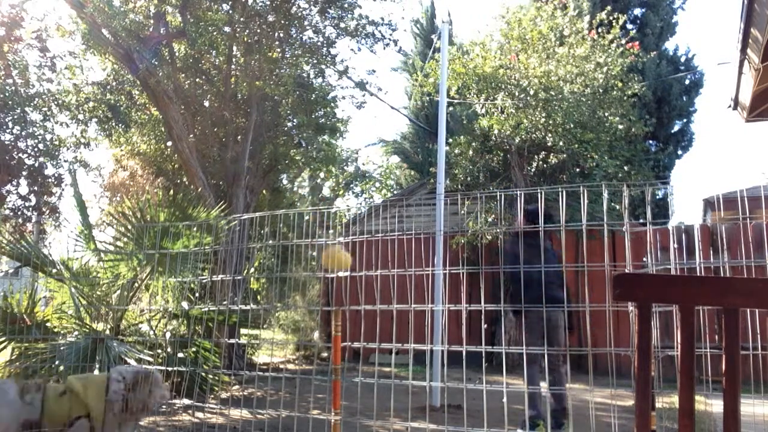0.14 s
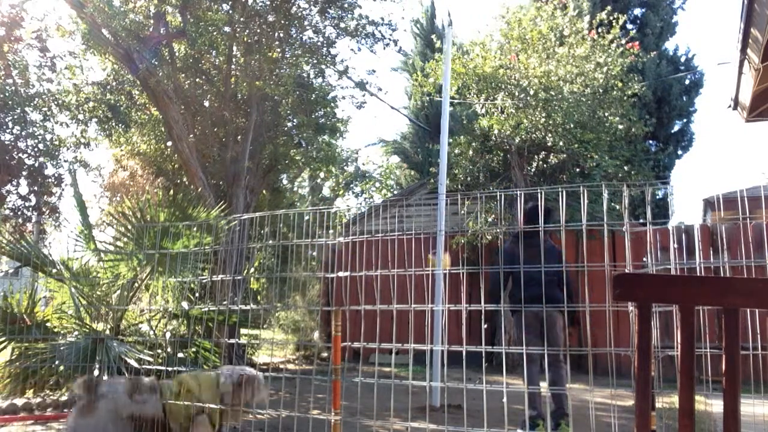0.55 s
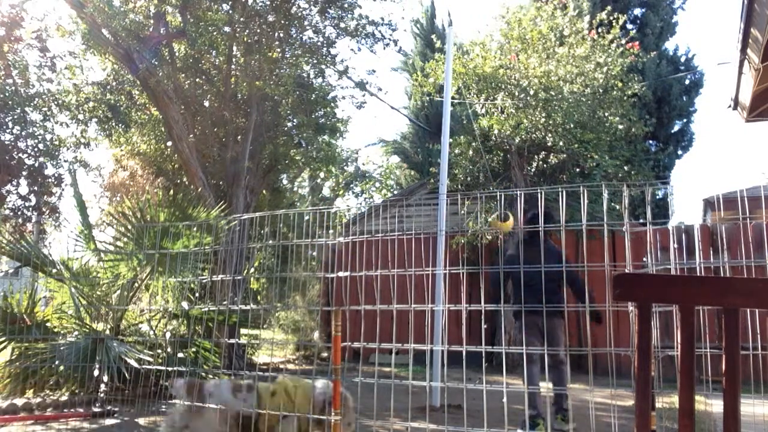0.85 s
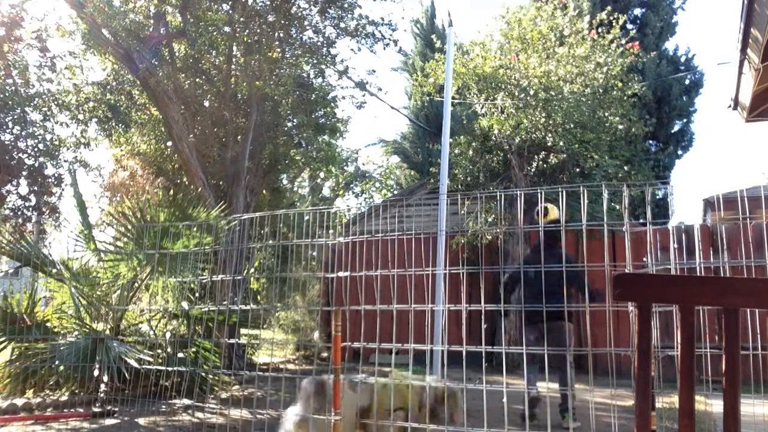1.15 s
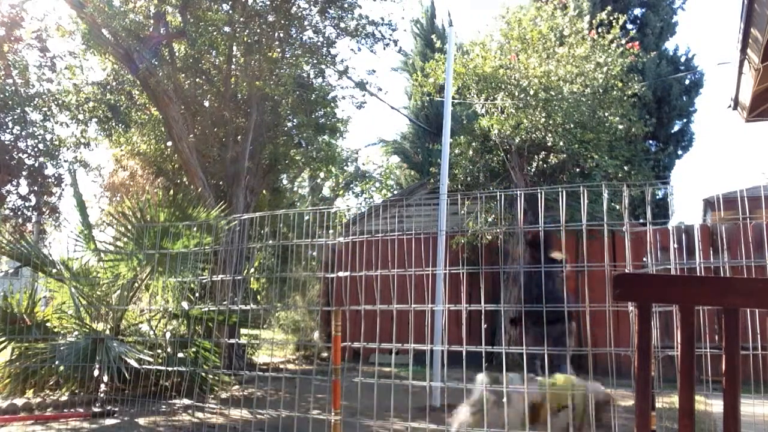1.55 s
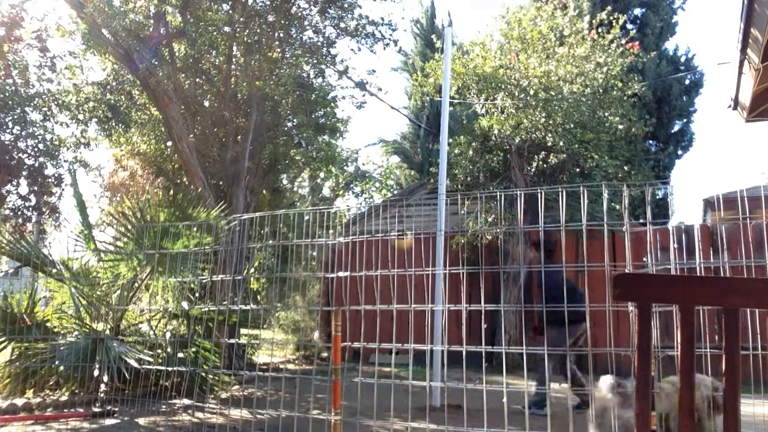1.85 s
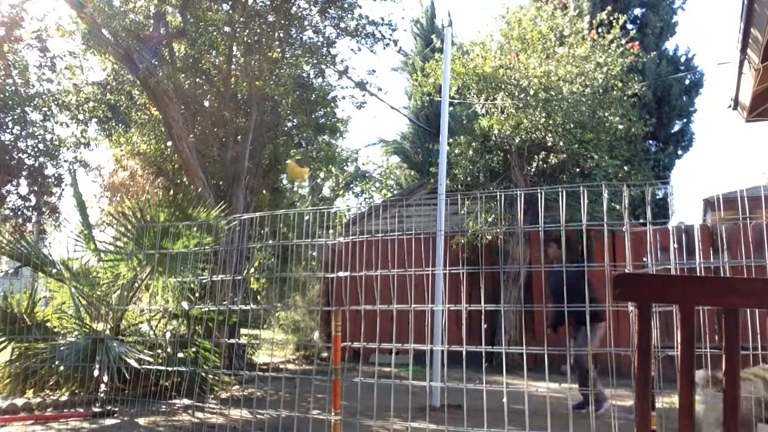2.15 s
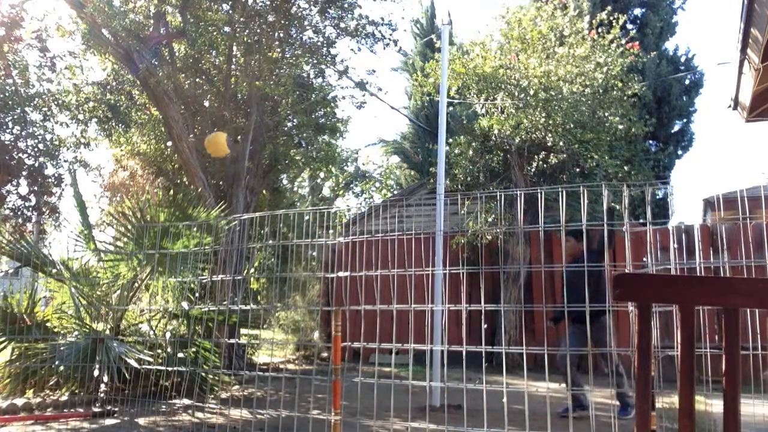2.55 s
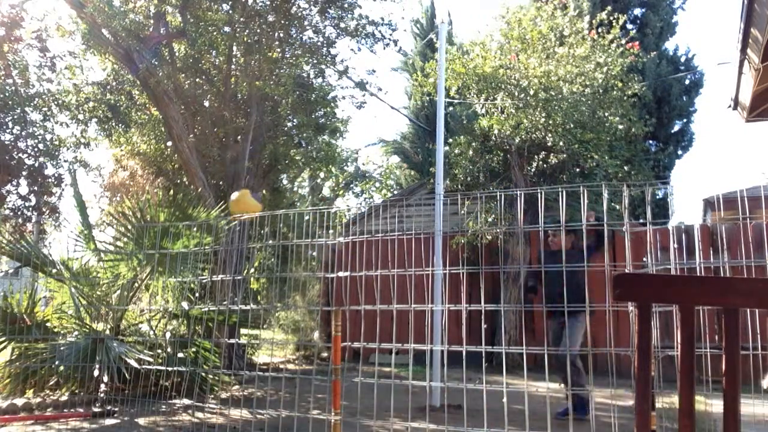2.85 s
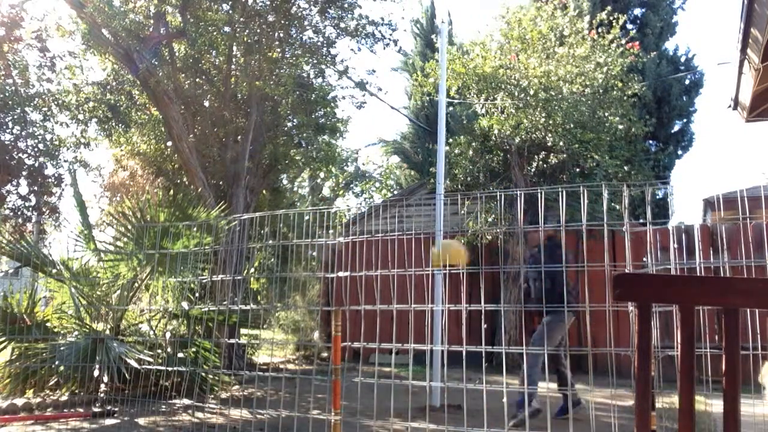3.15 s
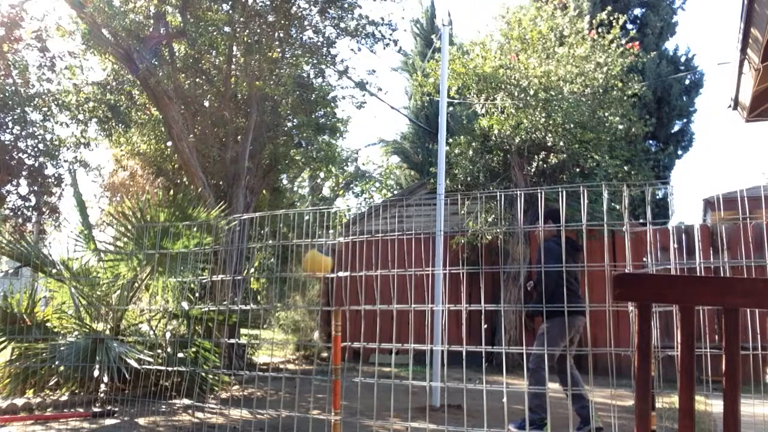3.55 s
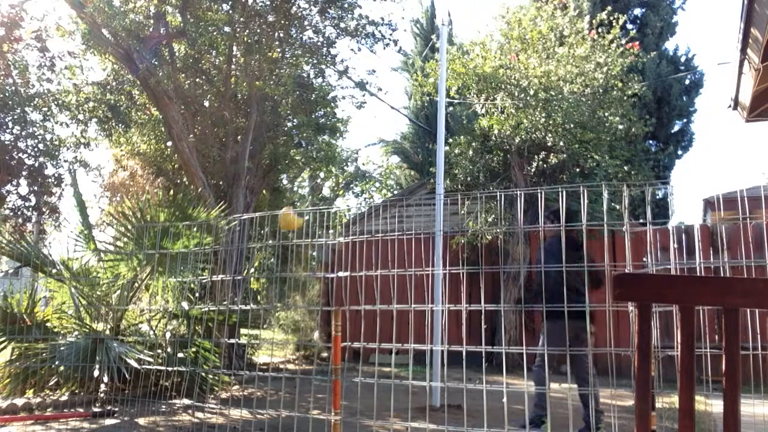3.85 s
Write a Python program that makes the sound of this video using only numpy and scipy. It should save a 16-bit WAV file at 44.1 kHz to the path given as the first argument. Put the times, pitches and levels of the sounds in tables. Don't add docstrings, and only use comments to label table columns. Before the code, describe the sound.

Outdoors in a fenced yard, light clinks and scuffs lead to a hollow ball punch, then sharper metal knocks, then a louder punch and gritty steps, over faint traffic hum and hiss from a distant mono microphone.

```python
import sys
import numpy as np
from scipy import signal
from scipy.io import wavfile

SR = 44100
rng = np.random.default_rng(int(sys.argv[2]) if len(sys.argv) > 2 else 0)


def generate_wav(signal):
    frames = np.transpose(np.atleast_2d(signal))
    scaled = np.clip(frames, -1, 1) * 32767
    pcm = np.round(scaled).astype(np.int16)
    wavfile.write(sys.argv[1], SR, pcm)


def decibels_to_gain(level_db):
    exponent = np.asarray(level_db, float) / 20
    return 10 ** exponent


N = 176400
SPAN = SR * 6 // 10

EDGES = 45 * 2 ** np.arange(0, 9, .5)
CENTRES = np.sqrt(EDGES[1:] * EDGES[:-1])
BANK = [signal.butter(2, [low, high], "band", fs=SR, output="sos") for low, high in zip(EDGES, EDGES[1:])]

# pitch in Hz, level in dB per Hz.
AIR_COLOUR = [(29, -55), (50, -48), (162, 4), (365, -2.5), (510, -8), (680, -4.5), (1100, -7), (2360, -17),
              (15300, -26)]
# pitch in Hz, time to fall by 60 dB in seconds.
YARD_DECAY = [(80, 0.28), (250, 0.42), (1000, 0.29), (3000, 0.34), (8000, 0.24), (15000, 0.14)]
# middle in seconds, length in
# seconds, level in dB, brightest pitch in Hz, hiss in dB.
SCUFFS = [(0.086, 0.056, -66, 5000, 6), (0.229, 0.17, -59.5, 1500, -8.5), (.36, .06, -91, 1500, -22),
          (0.652, 0.047, -64, 1500, -17), (0.902, 0.02, -62.5, 5000, 13), (.98, 0.066, -60, 4000, 10),
          (1.05, 0.063, -64.5, 4000, 2), (2.585, 0.045, -58.5, 2000, -1), (1.462, 0.072, -52.5, 2460, -8),
          (1.703, 0.24, -63, 5070, 17), (1.843, 0.044, -60, 3100, 8), (1.953, 0.078, -52.5, 2140, -8),
          (2.042, 0.073, -68, 5000, 20), (2.44, 0.097, -64, 5840, 36), (2.669, 0.056, -50.5, 2060, -14.5),
          (2.828, 0.091, -66, 4000, 23), (2.93, .06, -84, 3500, -7), (3.228, 0.062, -64, 4000, 8),
          (3.355, 0.028, -48, 11500, -8), (3.52, 0.071, -53, 2360, 7), (3.616, 0.076, -46, 2330, -17),
          (3.792, 0.45, -62.5, 1600, -7), (3.9, 0.08, -68.5, 3340, 3)]
# middle in seconds, length in seconds, level in dB, pitch in Hz.
THUDS = [(0.228, 0.16, -60, 515), (0.338, .05, -61.5, 694), (0.713, 0.24, -62.5, 154),
         (0.832, 0.11, -63.5, 224), (0.927, 0.18, -65, 196), (0.987, 0.12, -58.5, 424),
         (1.244, 0.051, -73, 204), (1.31, 0.036, -88, 260), (1.905, 0.05, -57.5, 287),
         (1.949, 0.03, -52, 730), (2.07, 0.034, -62, 230), (2.329, 0.098, -56.5, 394),
         (2.666, 0.083, -55, 584), (2.894, 0.035, -66, 118), (3.25, 0.0091, -39.5, 474),
         (3.302, 0.008, -65, 500), (3.482, 0.067, -57.5, 457), (3.603, 0.094, -44.5, 547)]
# start in seconds, peak in dB, high rings in dB, crack in dB,
# low rings in dB.
CLINKS = [(0.1243, -44, -30, -1, -30), (0.6981, -32, -36, -1.5, -36), (1.7465, -40.5, -8, 20, -23),
          (2.2763, -36, -30, -20, -25), (2.2812, -20, -20, -1.5, -27.5), (2.5697, -44.5, -30, 9, -30),
          (3.0098, -45.5, -35, 3, -38), (3.4467, -23, -11, -6, -11), (3.7393, -39.5, -23, -12, -20),
          (3.836, -49.5, -23, -1, -23), (3.8558, -38, -36, 5.5, -33), (3.9474, -69, -19, 2, -30)]
CLINK_FACES = [0, 1, 1, 6, 2, 1, 7, 3, 4, 5, 5, 5]
CLIP_FACES = [
    [(4130, 210, 6), (5200, 1000, 2.5), (8300, 1200, -4.5)],
    [(1530, 1030, -1), (3260, 230, 3), (4000, 350, 4.5), (5340, 1200, 5.5), (6650, 610, 0.5),
     (8190, 810, 3.5), (9570, 340, -2)],
    [(1070, 210, 1), (1590, 600, -2), (5800, 1600, 1.5), (7000, 450, 2.5), (8900, 760, 8.5),
     (11700, 2100, 5.5)],
    [(2800, 430, 1.5), (5000, 400, 4), (5970, 1100, 6.5), (8070, 910, 10.5), (11700, 600, 2)],
    [(9100, 470, -0.5), (10460, 400, -4), (12160, 600, 5)],
    [(1600, 300, 1), (4400, 690, -2), (6370, 370, 3), (9550, 350, 11.5), (12160, 650, 1)],
    [(1700, 280, -4), (9100, 260, 7)],
    [(1600, 250, 4), (5000, 640, 7), (7730, 3300, -4), (11100, 2000, -20)],
]
# extra level of first contact in dB, rebound delay in seconds,
# rebound level in dB, extra damping in dB per second.
CONTACTS = [(-2, 0.014, -3.5, 54), (4, 0.016, 2, 50), (1.5, 0.013, 5.5, 8), (6.5, 0.02, 7, 49),
            (1, 0.013, -6, 120), (1.5, 0.015, 2, 55), (-9, .01, 0, 300), (0.5, 0.011, 0, 78)]
# pitch in Hz, level in dB, time to fall by 60 dB in seconds.
POLE_RINGS = [
    [(4745, -5, 1.3), (4795, 0, .4), (4861, 0, .3), (2730, -18, .3)],
    [(7671, 0, .28), (7730, -3, .3), (11350, -10, .25), (9600, -6, .12)],
]
# middle in seconds, length in seconds, level in dB,
# pitch in Hz.
HOLLOWS = [(.25, 0.058, -63, 987), (.99, 0.072, -59.5, 499), (1.0, 0.046, -60, 360),
           (1.85, 0.056, -63, 756), (2.0, 0.042, -63, 337), (3.255, .02, -48, 350),
           (3.6, 0.059, -54.5, 339), (3.63, 0.044, -63, 905), (3.64, 0.03, -53, 2350),
           (3.72, .08, -60.5, 250)]
# middle in seconds, length
# in seconds, level in dB, pitch in Hz.
CHIRPS = [(.32, .07, -79, 2750), (.58, .07, -77, 2760), (1.27, .06, -80, 2800), (2.21, .03, -76, 2780),
          (2.41, .04, -77, 2730), (2.84, .04, -73, 2740), (3.1, .1, -77, 7400)]
PUNCH_TIMES = [1.6358, 3.2996]
# peak in dB, slap in dB, echo in dB.
PUNCHES = [
    (-18.5, -4.5, -7.5),
    (-11.5, 5, -6),
]
# delay in seconds, level in dB.
WALLS = [(.0037, 1), (.0075, -5), (.0125, -6), (.024, -14)]
# pitch in Hz, level in dB per Hz.
PUNCH_COLOURS = [
    [(35, -43), (60, -6), (320, -1), (889, -13.5), (976, 2), (1150, -4), (1350, -15.5), (7370, -20),
     (15500, -39)],
    [(35, -42), (60, -4), (266, -6), (792, -13), (1020, -2), (1790, -19), (2010, -15.5), (8090, -12),
     (15500, -66)],
]
# pitch in Hz, level in dB, time to fall by 60 dB in seconds.
BALL_RINGS = [
    [(89, -5.5, 0.16), (204, -3, 0.62), (270, -2, .25), (334.3, 8, 0.099), (506, -34, 0.18),
     (570, -17, 0.33), (820, 0.5, 0.11), (1009, 5, 0.17), (1200, -23, .2), (1222, 2.5, 0.16),
     (1283, 9, 0.089), (1730, -20, 0.13), (1870, -5, .12), (2680, -8, 0.091)],
    [(90, 2.5, 0.1), (197.4, -20, 0.71), (274.4, 12, 0.16), (439, -3.5, 0.28), (457.4, 1, .22),
     (537, 1, 0.16), (620, 1, 0.27), (703, -3.5, 0.29), (980, -14, 0.6), (990, 9.5, 0.2), (1410, 4, 0.14),
     (1660, 1.5, 0.11), (1920, 6.5, .1), (2540, 2, 0.089)],
]
# pitch in Hz, width in Hz, level in dB.
SKIN = [
    [(2450, 1400, -14), (4030, 550, -24), (5700, 970, -6.5)],
    [(3030, 280, -6), (5100, 210, -8), (7770, 3600, -6.5)],
]


def rms_one(x):
    return x / np.sqrt(np.mean(x ** 2) + 1e-20)


def peak_one(x):
    return x / np.abs(x).max()


def add(out, start_s, x, db):
    i = int(start_s * SR)
    out[i:i + len(x)] += decibels_to_gain(db) * peak_one(x)


def at_hz(points, hz):
    table_hz, values = np.array(points).T
    return np.interp(np.log(hz), np.log(table_hz), values)


def bands(x):
    x = np.atleast_2d(x)
    return np.array([signal.sosfilt(sos, x[k % len(x)]) for k, sos in enumerate(BANK)])


def hump(hz, octaves, skirt_db):
    peak = np.exp(-.5 * (np.log2(CENTRES / hz) / octaves) ** 2)
    skirt = decibels_to_gain(skirt_db) / (1 + (CENTRES / 9000) ** 2)
    return (peak + skirt)[:, None]


def drift(rate_hz):
    r = np.exp(-80 * np.pi * rate_hz / SR)
    slow = signal.lfilter([1], [1, -2 * r, r * r], rng.standard_normal(N // 40 + 2002))[2000:]
    return np.interp(np.arange(N) / 40, np.arange(len(slow)), rms_one(slow))


def resonate(x, peaks):
    out = 0
    for k, (hz, width, db) in enumerate(peaks):
        r = np.exp(-np.pi * width / SR)
        top, bottom = [(1 - r * r) / 2, 0, (r * r - 1) / 2], [1, -2 * r * np.cos(2 * np.pi * hz / SR), r * r]
        out = out + (-1) ** k * decibels_to_gain(db) * signal.lfilter(top, bottom, x)
    return out


def ring(modes, squeeze):
    settle_s = 0.009
    hz, db, t60 = np.transpose(modes)[:, :, None]
    t = np.arange(SPAN) / SR
    turns = hz * (t + squeeze * settle_s * (1 - np.exp(-t / settle_s)))
    return (decibels_to_gain(db - 60 * t / t60) * np.sin(2 * np.pi * turns)).sum(0)


def echoes(per_s):
    direct_db, growth_s = 9, .02
    t = np.arange(SPAN) / SR
    rate = np.clip(per_s * (1 + (t / growth_s) ** 2) / SR, 0, 1)
    taps = (rng.random((2, SPAN)) < rate) * rng.standard_normal((2, SPAN)) / np.sqrt(rate)
    taps[:, 0] = -decibels_to_gain(direct_db) / np.sqrt(rate[0])
    return bands(taps + 1e-18) * decibels_to_gain(-60 * t / at_hz(YARD_DECAY, CENTRES)[:, None])


def strokes(rows, octaves, attack, noise):
    t, out = np.arange(N) / SR, np.zeros(N)
    for middle_s, length, db, hz, hiss_db in rows:
        near = slice(max(int((middle_s - length) * SR), 0), int((middle_s + length + 1.2) * SR))
        side = np.where(t[near] < middle_s, attack, .7) * length
        rise = np.clip((t[near] - middle_s) / side, -1, 1)
        power = np.cos(rise * np.pi / 2) ** 2.37
        stroke = np.sqrt(signal.lfilter([.002], [1, -.998], power))
        colour = rms_one((hump(hz, octaves, hiss_db) * noise[:, near]).sum(0))
        out[near] += decibels_to_gain(db) * stroke * colour
    return out


def notes(rows, share):
    out = np.zeros(N + SR)
    for (middle_s, length, db, hz), noise in zip(rows, rng.standard_normal((len(rows), SPAN))):
        peak = [(hz, share * hz, 0)]
        tone = rms_one(resonate(resonate(noise, peak), peak))
        swell = np.hanning(int(2 * length * SR))
        start = int((middle_s - length) * SR)
        out[start:start + len(swell)] += decibels_to_gain(db) * swell * tone[-len(swell):]
    return out[:N]


def air():
    noise = bands(rng.standard_normal((2, N + SR)))[:, SR:]
    gains = decibels_to_gain(at_hz(AIR_COLOUR, CENTRES))[:, None]
    return decibels_to_gain(-60.5) * rms_one((gains * noise).sum(0))


def scuffs():
    grains_per_s, patchy_db = 1600, 2.5
    grains = (rng.random((2, N)) < grains_per_s / SR) * rng.choice([-1, 1], (2, N))
    grit = bands(rms_one(grains) + 0.21 * rng.standard_normal((2, N)))
    grit = grit * decibels_to_gain([patchy_db * drift(27.0) for _ in grit])
    drags = strokes(SCUFFS, octaves=.6, attack=0.72, noise=grit)
    hiss_db = -40
    thuds = strokes([(*row, hiss_db) for row in THUDS], octaves=0.59, attack=0.36, noise=grit)
    return drags + thuds


def clip_face(x, face):
    blur, out = 2.2, 0
    for hz, width, db in CLIP_FACES[face]:
        once = resonate(x, [(hz, blur * width, db)])
        out = out + resonate(once, [(hz, blur * width, 0)])
    return peak_one(out)


def clinks():
    early_s, rebound_s, wobble_db = .004, .002, 1.2
    out, t = np.zeros(N + SR), np.arange(SPAN) / SR
    for (start_s, db, high_db, crack_db, low_db), face in zip(CLINKS, CLINK_FACES):
        yard = echoes(per_s=4000)
        crack = peak_one((hump(6000, octaves=2, skirt_db=10) * yard).sum(0))
        clip = clip_face(yard.sum(0), face)
        pole = (decibels_to_gain(low_db) * ring(POLE_RINGS[0], 0) + decibels_to_gain(high_db) * ring(POLE_RINGS[1], 0)) / 2
        pole = pole * decibels_to_gain(wobble_db * drift(50)[:SPAN])
        early_db, lag, rebound_db, damping_db = CONTACTS[face]
        first = early_db * np.exp(-(t / early_s) ** 2)
        rebound = rebound_db * np.exp(-((t - lag) / rebound_s) ** 2)
        knock = (clip + decibels_to_gain(crack_db) * crack) * decibels_to_gain(first + rebound - damping_db * t)
        add(out, start_s, knock + pole * np.minimum(t / early_s, 1), db)
    return out[:N]


def hollows():
    return notes(HOLLOWS, share=.07)


def chirps():
    return notes(CHIRPS, share=.025)


def ball_body(k):
    tones = ring(BALL_RINGS[k], squeeze=0.037)
    soft = signal.lfilter(*signal.butter(1, 1500, fs=SR), tones)
    return peak_one(soft) * decibels_to_gain(2.5 * drift(90)[:SPAN])


def fist_slap():
    click = np.eye(1, SPAN)[0]
    snap = signal.lfilter([-1, .9], [1, -.75], click)
    return peak_one(signal.lfilter(*signal.butter(2, 9000, fs=SR), snap))


def skin(x, peaks):
    high = signal.sosfilt(signal.butter(2, 2200, "high", fs=SR, output="sos"), x)
    plain_share = .45
    return x + (plain_share - 1) * high + resonate(high, peaks)


def punches():
    out = np.zeros(N + SR)
    for k, (start_s, (db, slap_db, echo_db)) in enumerate(zip(PUNCH_TIMES, PUNCHES)):
        gains = decibels_to_gain(at_hz(PUNCH_COLOURS[k], CENTRES))[:, None]
        body = ball_body(k)
        slap = decibels_to_gain(slap_db) * fist_slap()
        returned = slap - decibels_to_gain(-24.0) * body
        walls = sum(decibels_to_gain(wall_db) * np.roll(returned, int(lag * SR)) for lag, wall_db in WALLS)
        yard = peak_one(skin((gains * echoes(per_s=3000)).sum(0), SKIN[k]))
        add(out, start_s, slap - decibels_to_gain(2) * body + walls + decibels_to_gain(echo_db + 4) * yard, db)
    return out[:N]


def scene():
    mix = air() + scuffs() + clinks() + hollows() + chirps() + punches()
    return mix[None, :]


def low_pass(x):
    return signal.sosfilt(signal.butter(12, 16470, fs=SR, output="sos"), x)


def record(dry):
    low_cut = signal.butter(6, 69, "high", fs=SR, output="sos")
    top_cut = signal.cheby2(10, 30, 15650, fs=SR, output="sos")
    mix = signal.sosfilt(np.vstack([low_cut, top_cut]), dry)
    return low_pass(mix)


dry = scene()
out = record(dry)
generate_wav(out)
```